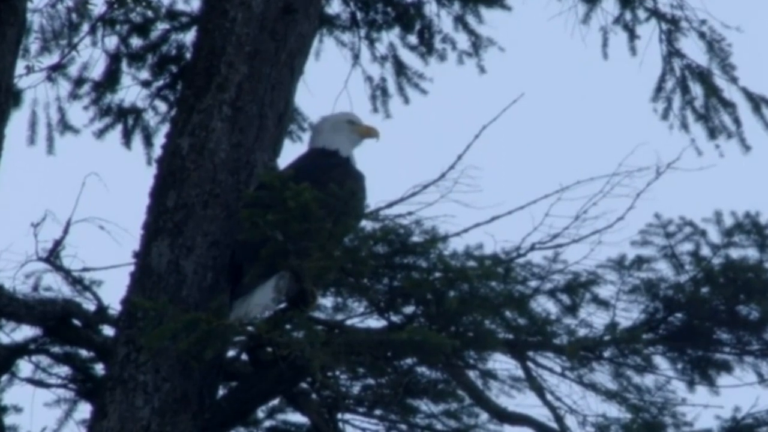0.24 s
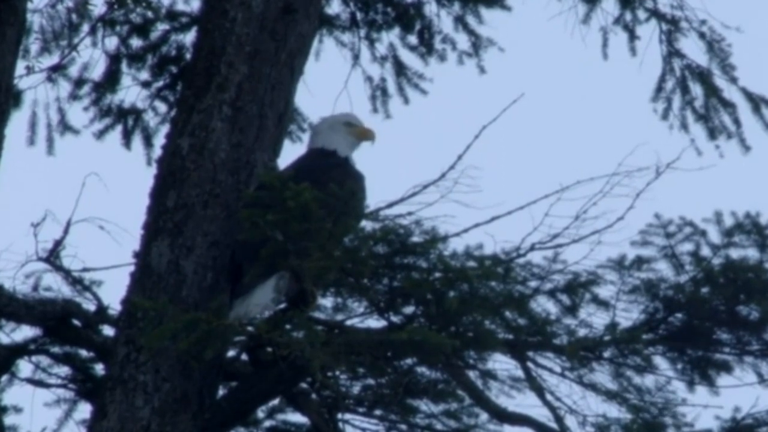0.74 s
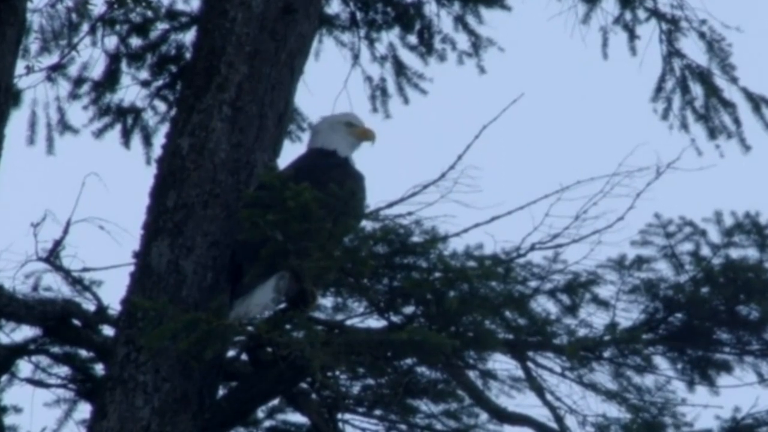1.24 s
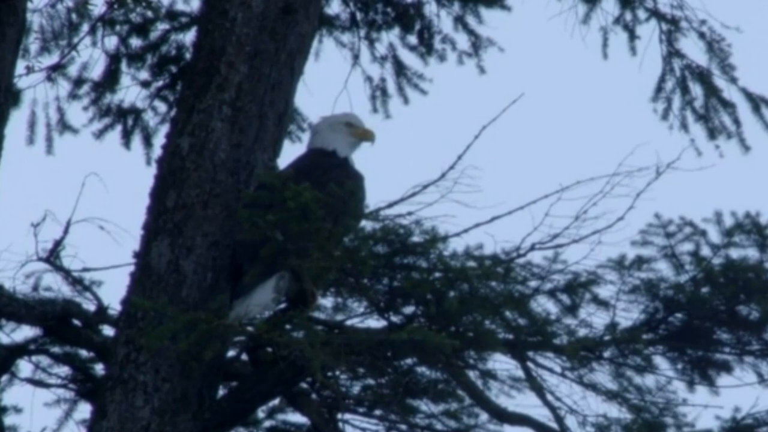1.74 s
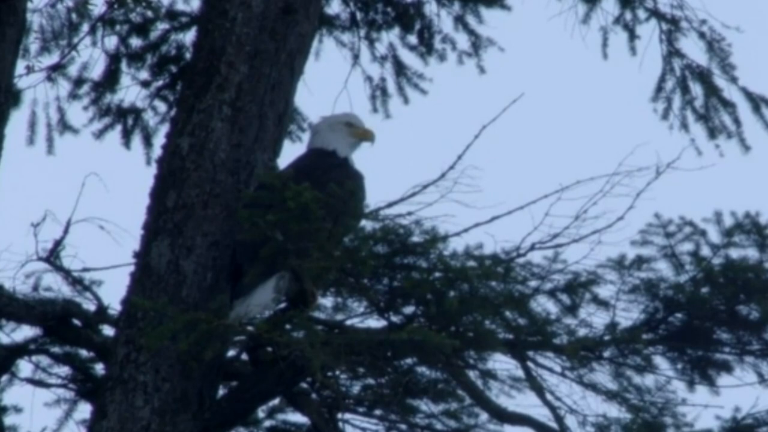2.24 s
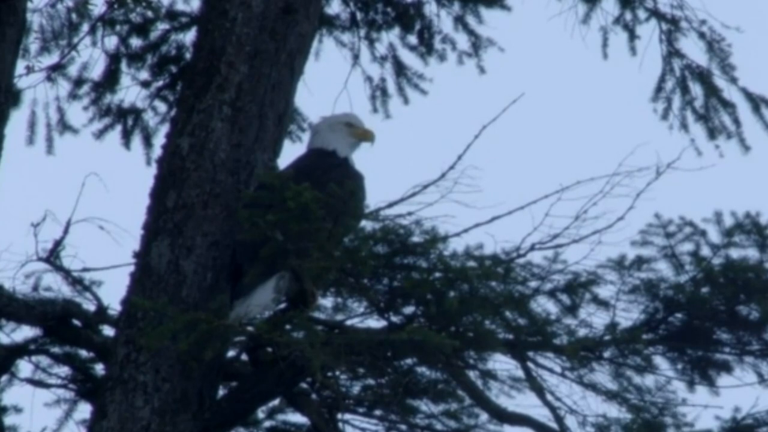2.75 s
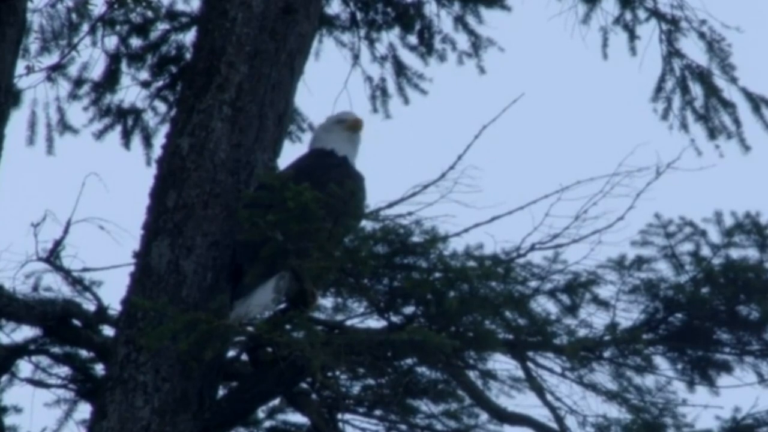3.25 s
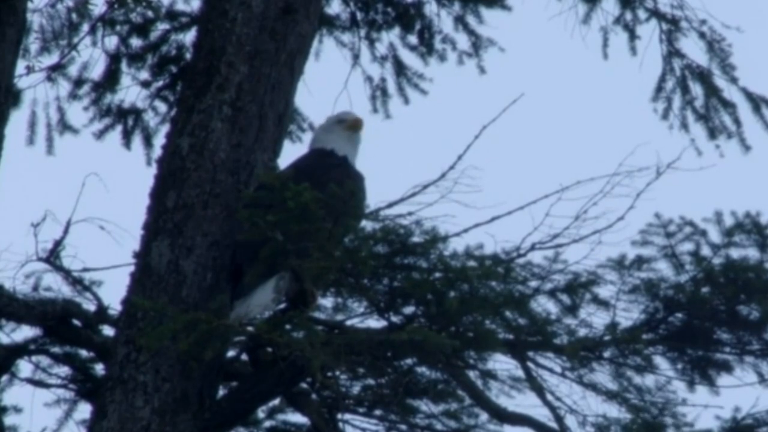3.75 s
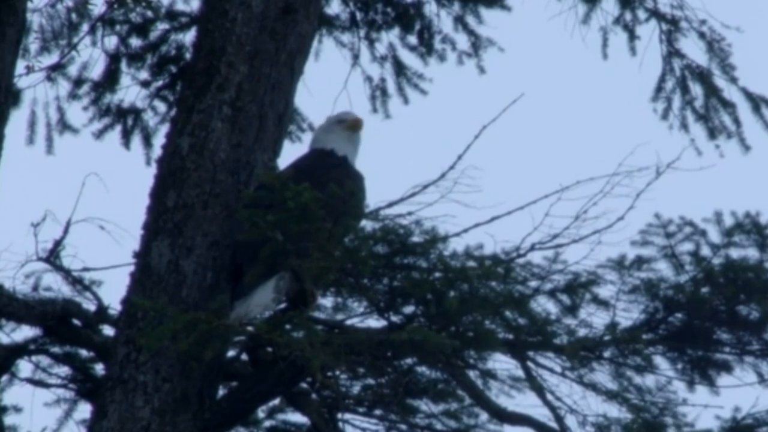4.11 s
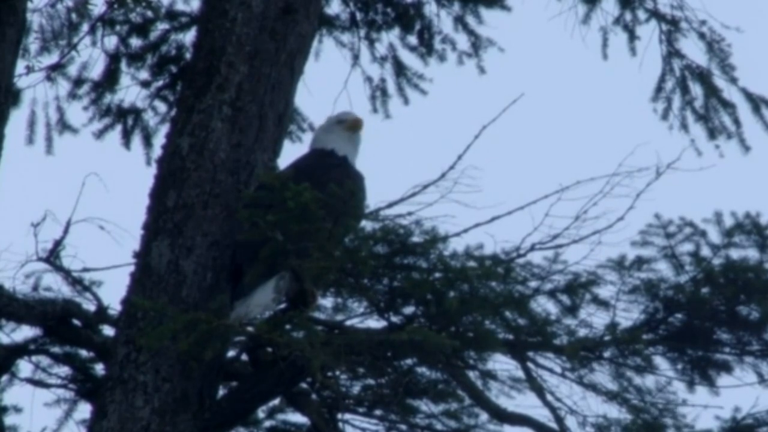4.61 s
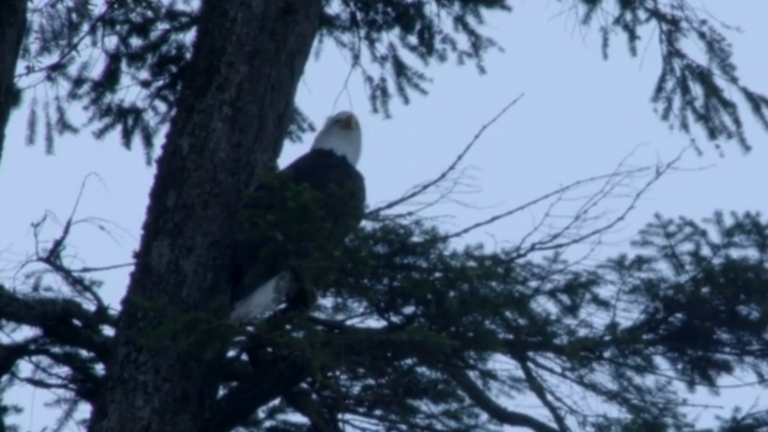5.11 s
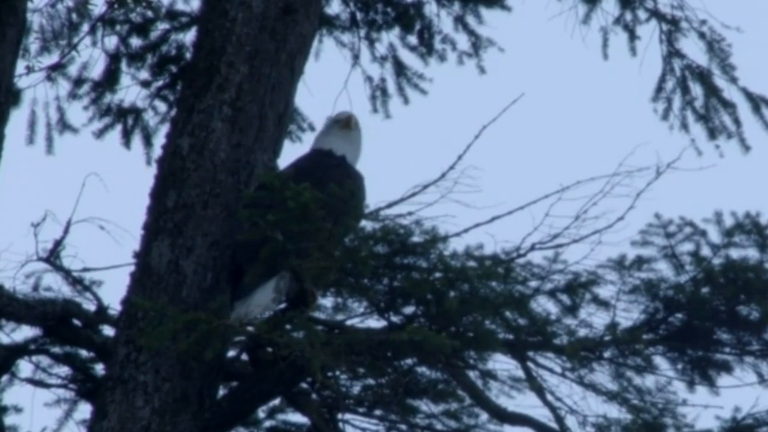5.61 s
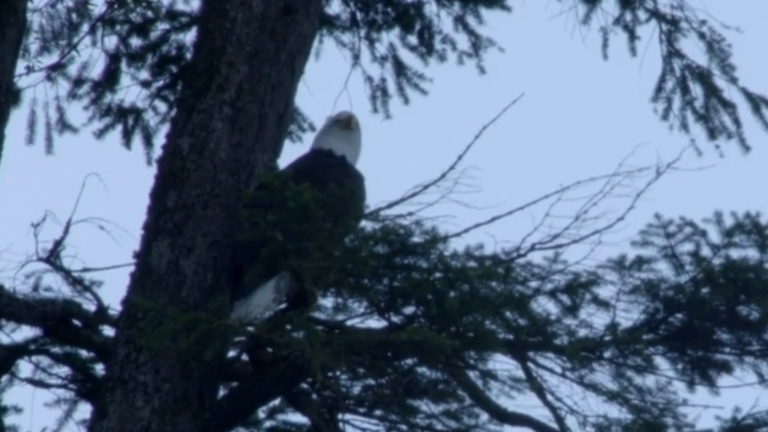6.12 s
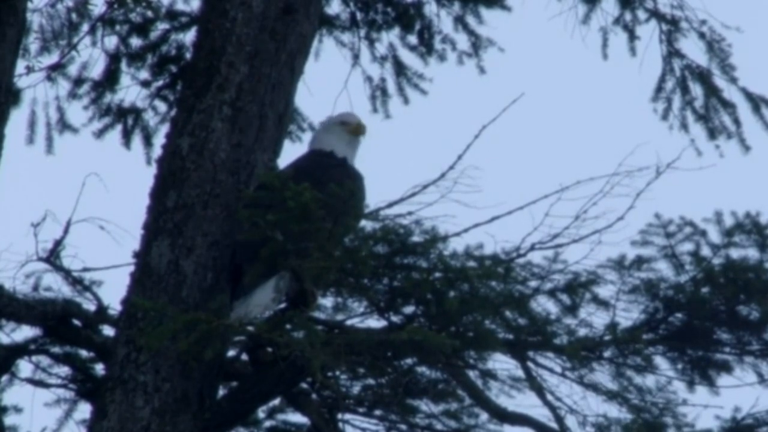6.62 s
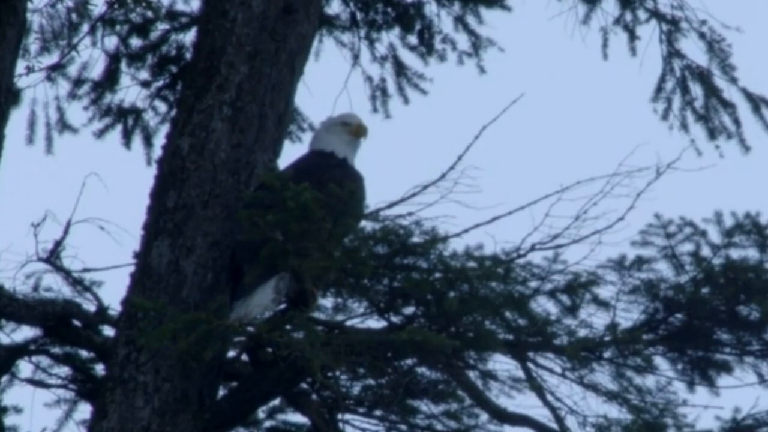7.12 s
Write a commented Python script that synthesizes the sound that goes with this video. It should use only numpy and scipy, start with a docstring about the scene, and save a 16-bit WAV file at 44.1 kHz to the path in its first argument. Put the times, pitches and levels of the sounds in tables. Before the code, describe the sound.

An eagle perched in a tree calls twice, close and central, each call a thin two-toned squeal cracking into a strong, dropping whistle. Around it, a second bird on the right repeats short downward yelps ever faster, a high trill pulses on the left, and distant pips and dry woody rattles appear. Steady insect hiss, forest air and a low hum lie underneath, with slight woodland echo.

```python
"""Eagle calling in a forest

A bald eagle calls twice from a conifer: a thin two-voiced squeal breaks into a loud falling whistle with a
rough end, from syrinx oscillators in one throat. To the right another bird runs through a quickening series
of falling yelps, made as pitch slurs. Around them are pulsed trills, small gliding chirps, twig scratches and
a rattle of damped wood modes, over insect hiss and forest air of filtered noise; early on a low hum switches
in and a rumble passes."""
import sys
import numpy as np
from scipy import signal
from scipy.fft import rfft, irfft
from scipy.io import wavfile
from scipy.ndimage import uniform_filter1d

SR = 44100
rng = np.random.default_rng(int(sys.argv[2]) if len(sys.argv) > 2 else 0)


def bounce(signal):
    """Save signal as a 16-bit WAV file at the path given by the first command-line argument."""
    frames = np.transpose(np.atleast_2d(signal))
    limited = np.clip(frames, -1, 1)
    pcm = np.round(limited * 32767).astype(np.int16)
    wavfile.write(sys.argv[1], SR, pcm)


N = 324576
T = np.arange(N) / SR  # time [s]


# resonances of the throat: (frequency [Hz], gain [dB])
THROAT = [(1000, -10.5), (1550, -12), (2400, -1), (3200, 2), (4800, -7), (6300, -5), (7700, -10.5),
          (8600, -8.5), (9500, -10), (10600, -21.5), (11500, -46)]
# spectral shape of air through the beak: (frequency [Hz], relative level [dB])
BEAK_HISS = [(4500, -39), (7500, -2), (11000, 2.5), (13000, -28)]
# nearby trunks that throw the cry back: (delay [s], level [dB])
TRUNKS = [(.021, -34), (.034, -27)]
# the squeal that opens the first call: (time [s], pitch [Hz], level [dB])
FIRST_SQUEAL = [(4.598, 3200, -46), (4.606, 3020, -42), (4.618, 3600, -33.5), (4.632, 3790, -30.5),
                (4.662, 3820, -24), (4.688, 4030, -20.5), (4.696, 4370, -21), (4.718, 4690, -15.5),
                (4.745, 4640, -19), (4.79, 4380, -20), (4.818, 4440, -21.5), (4.823, 3700, -17.5),
                (4.83, 3250, -21), (4.834, 2450, -30), (4.845, 2400, -33), (4.852, 2750, -39)]
# the squeal that opens the second call: (time [s], pitch [Hz], level [dB])
SECOND_SQUEAL = [(5.591, 2972, -53), (5.598, 3470, -25), (5.642, 6180, -29), (5.665, 4550, -25.5),
                 (5.695, 4170, -25), (5.75, 4380, -20.5), (5.783, 4500, -18.5), (5.792, 3900, -17),
                 (5.805, 2450, -25)]
# the loud whistles: (start [s], hold [s], release [s], pitch [Hz], sag [Hz/s], break [Hz], level [dB],
# level change while held [dB/s], second harmonic [dB], third harmonic [dB], slap of the slack membrane [dB],
# period doubles after [s from start], half-pitch share [0-1])
WHISTLES = [(4.846, 0.094, 0.086, 3146, 1344, 421, -13, 11, -19, -30.5, -7, 0.14, .05),
            (5.818, 0.12, 0.058, 3181, 520, 518, -7.5, -31.5, -11.5, -17, -13, 0.065, 0.41)]
# the other side of the syrinx: (start [s], end [s], first pitch [Hz], last pitch before the collapse [Hz],
# last level [dB], swell [dB], second harmonic [dB])
SECOND_VOICES = [(4.732, 4.839, 4640, 5000, -18.5, 4, -30), (5.663, 5.807, 5050, 5350, -15.5, 12.5, -7.5)]
# the voice cracks between squeal and whistle: (start [s], pitch reached [Hz], level [dB])
CRACKS = [(4.831, 3850, -17), (5.801, 4010, -15)]
ECHO_S = .165


def eagle(coupling=0.28, hiss_db=-20):
    """Nonlinear coupling: two voices share one airflow and throat, so sum tones arise; trees scatter the cry."""
    lead = squeal(FIRST_SQUEAL, second_db=-24.5, third_db=-30)
    lead = lead + squeal(SECOND_SQUEAL, second_db=-10.5, third_db=-18)
    lead = lead + sum(whistle(*row) for row in WHISTLES)
    upper = sum(second_voice(*row) for row in SECOND_VOICES) + sum(crack(*row) for row in CRACKS)
    # the product of two analytic signals holds only sum frequencies
    sum_tones = np.real(signal.hilbert(lead) * signal.hilbert(upper))
    # air hisses through the beak, most while both voices sound
    air = noise(BEAK_HISS, channels=1)[0]
    flow = uniform_filter1d(np.abs(upper) + 0.11 * np.abs(lead), size=300)
    hiss = undb(hiss_db) * flow * air / air.std()
    voice = colour(lead + upper + coupling * sum_tones + hiss, THROAT)

    branches = trees(voice, t60=.07, wet_db=-26).mean(axis=0)
    trunks = sum(undb(db) * np.interp(T - s, T, voice) for s, db in TRUNKS)
    echo = trees(np.interp(T - ECHO_S, T, voice), t60=.025, wet_db=-38)
    return voice + branches + trunks + echo + trees(voice, t60=.5, wet_db=-28)


STEADY_ROUGH, ROUGH_PER_OCTAVE_S = 0.034, 0.019  # roughness at rest, and per octave/s of slide


def squeal(rows, second_db, third_db):
    """Instability under rapid pitch change: a thin tone, clean where it holds and rough where it slides."""
    hz, db = curve(rows)
    octaves_per_s = uniform_filter1d(np.abs(np.gradient(np.log2(hz))) * SR, size=400)
    rough = np.minimum(STEADY_ROUGH + ROUGH_PER_OCTAVE_S * octaves_per_s, .27)
    sounding = gate(rows[0][0], rows[-1][0], .003, 0.0017)
    return membrane(hz, rough, second_db, third_db) * undb(db) * sounding


def second_voice(start, end, first_hz, last_hz, db, swell_db, second_db,
                 edge_s=0.024, edge_rough=0.32, collapse_hz=350):
    """Independent second oscillator: it rises, levels off, and is rough as it catches and collapses."""
    to_go = (1 - np.clip((T - start) / (end - start), 0, 1)) ** 1.9
    collapse = np.clip(1 - (end - T) / edge_s, 0, 1)
    hz = last_hz + (first_hz - last_hz) * to_go - collapse_hz * collapse
    rough = STEADY_ROUGH + edge_rough * (1 - gate(start, end, edge_s, edge_s))
    tone = membrane(hz, rough, second_db, third_db=-43)
    return tone * undb(db - swell_db * to_go) * gate(start, end, .004, edge_s)


CRACK_S, CRACK_SCOOP_HZ, CRACK_RISE_S, CRACK_ROUGH = 0.024, 550, 0.0054, 0.25


def crack(start, hz, db):
    """Exponential pitch approach: a rough blip that scoops up to its pitch."""
    pitch = hz - CRACK_SCOOP_HZ * np.exp(-np.maximum(T - start, 0) / CRACK_RISE_S)
    tone = membrane(pitch, CRACK_ROUGH, second_db=-26.5, third_db=-53)
    return tone * undb(db) * gate(start, start + CRACK_S, 0.0083, 0.014)


ATTACK_S, SETTLE_HZ, SETTLE_S = 0.018, 238.3, 0.0198  # a whistle starts sharp and settles
BREAK_S, FALL_HZ, FALL_DB = .009, 980, 18  # in the release the pitch breaks down a step, then slides away
CATCH_S, STALL_ROUGH = .0018, .28
CRACKLE_DB, CRACKLE_HZ = 2, 450
WHISTLE_ROUGH, RELEASE_ROUGH, RELEASE_HALF = 0.028, 0.16, 0.38
FALTER_HZ, FALTER_DEPTH, FALTER_S = 188, 0.22, 0.01  # the tone flutters around the break
# the voice stalls and catches again higher: (time [share of the release], jump [Hz], dip [0-1])
CATCHES = [(.55, 190, .65), (.77, 70, .4)]


def whistle(start, hold, release, hz, sag, break_hz, db, swell, second_db, third_db, slap_db,
            doubles_after, share):
    """Register break: a clean sagging tone flutters as the pressure goes, breaks down, catches and roughens."""
    t = np.clip(T - start, 0, hold + release)
    held = np.minimum(t, hold)
    spent = np.clip((t - hold) / release, 0, 1)
    broken = (1 + np.tanh((t - hold) / BREAK_S - 1)) / 2
    pitch = hz + SETTLE_HZ * np.exp(-t / SETTLE_S) - sag * held - break_hz * broken - FALL_HZ * spent ** 2
    stall = 0
    for when, jump_hz, dip in CATCHES:
        catch = (t - hold - when * release) / CATCH_S
        pitch = pitch + jump_hz * (1 + np.tanh(2 * catch)) / 2
        stall = stall + dip * np.exp(-catch ** 2)
    rough = WHISTLE_ROUGH + RELEASE_ROUGH * broken * np.sqrt(spent) + STALL_ROUGH * stall

    # period doubling, first in the held tone and then in the release
    held_half = share * np.clip((t - doubles_after) / 0.0047, 0, 1) * (1 - broken) ** 2
    release_half = RELEASE_HALF * np.clip((t - hold) / BREAK_S - 1.7, 0, 1) * (1 + spent)

    crackle = undb(CRACKLE_DB * broken * np.tanh(walk(CRACKLE_HZ)))
    near_break = np.exp(-((t - hold - FALTER_S) / FALTER_S) ** 2)
    falter = 1 + FALTER_DEPTH * near_break * np.sin(2 * np.pi * FALTER_HZ * (t - hold))
    level = undb(db + swell * held - FALL_DB * spent ** 1.88)
    strength = (1 - np.exp(-t / ATTACK_S)) * falter * crackle * (1 - stall) * level
    sounding = gate(start, start + hold + release, .003, .008)
    tone = membrane(pitch, rough, second_db, third_db, held_half + release_half, slap_db)
    return tone * strength * sounding


def membrane(hz, rough, second_db, third_db, half=0, slack_db=-13,
             jitter=0.13, shimmer=1.0, air=0.21, sub_db=-11):
    """Self-sustained oscillation of one syrinx side: a near sine, unsteady and period-doubling when slack."""
    rough = np.clip(rough, 0, 1)
    # at low pitch the slack membrane slaps shut, which lifts the second harmonic
    slack = np.clip((2870 - hz) / 200, 0, 1)
    # and its cycles turn irregular
    unsteady = 1 + rough * (jitter + .05 * slack) * walk(700)
    phase = turn(uniform_filter1d(hz, size=130) * unsteady)
    second = undb(second_db) + undb(slack_db) * slack * (1 - half)
    wave = np.sin(phase) + second * np.sin(2 * phase) + undb(third_db) * np.sin(3 * phase)
    # strong and weak cycles alternate, which puts lines halfway between the harmonics
    wave = wave * (1 + half * np.cos(phase / 2)) + undb(sub_db) * half * slack * np.sin(phase / 2)
    # the swing falters, and turbulent air rides on the tone
    return wave * (1 + shimmer * rough * np.tanh(walk(320)) + air * np.sqrt(rough) * walk(2400))


# model yelp, before its course reshapes it: (time from start [s], pitch [Hz], level [dB])
YELP = [(-.005, 1760, -30), (0, 1610, -6), (.005, 1465, 0), (.009, 1405, 0), (.016, 1340, -2),
        (.022, 1130, -8), (.029, 1010, -6), (.036, 945, -12), (.045, 850, -30)]
# the series of yelps: (time [s], relative level [dB])
YELPS = [(4.472, -40.5), (4.681, -35), (4.872, -32), (5.032, -30), (5.19, -31), (5.334, -31),
         (5.472, -28.5), (5.61, -29), (5.743, -28), (5.873, -28.5), (5.997, -27.5), (6.115, -28.5),
         (6.229, -27), (6.337, -27.5), (6.446, -26.5), (6.548, -26.5), (6.647, -28.5), (6.747, -28),
         (6.85, -30), (6.95, -30.5), (7.045, -30.5)]
# course of the series, from flat and short to fast and full:
# (time [s], share of the full slide [ratio], drop comes sooner by up to [s], fade of the low end [dB])
YELP_COURSE = [(4.5, .45, 0, 7), (5.2, .7, 0, 4), (5.7, .95, 0, 3), (6.3, .97, 0, 1.5), (6.7, 1, .001, 0),
               (7.05, .92, .004, -3)]
YELP_CENTRE_HZ = 1433  # the slide is scaled about this pitch


def yelping_bird(pan_db=-7, second_db=-17):
    """Frequency modulation: downward slurs whose slide, timing and low end change as the series quickens."""
    out, waver, ragged = np.zeros(N), walk(250), undb(1.5 * walk(110))
    length = YELP[-1][0]
    for s, db in YELPS:
        near = (T > s + YELP[0][0]) & (T < s + length)
        t = T[near] - s
        reach, hurry_s, fade_db = curve(YELP_COURSE, s)
        hz = curve(YELP, t + hurry_s * np.sin(np.pi * t / length))[0]
        # each yelp slides a little differently
        hz = hz * (1 + (.015 + .6 * t) * rng.standard_normal() + .015 * waver[near])
        phase = turn(YELP_CENTRE_HZ + (hz - YELP_CENTRE_HZ) * reach)
        late = np.clip((t - .01) / 0.014, 0, 1)
        tone = np.sin(phase) + undb(second_db) * late * np.sin(2 * phase)
        level = undb(db + curve(YELP, t)[1] - fade_db * late)
        out[near] += level * ragged[near] * tone
    # the scatter comes mostly from the bird's own side
    side_gain = undb(np.array([[pan_db], [-pan_db]]) / 3)
    scatter = trees(out, t60=.65, wet_db=-6) * side_gain
    branches = trees(out, t60=.09, wet_db=-11)
    return place(out, pan_db, lag_ms=0.1) * undb(-2.5) + branches + scatter


# high trills: (start [s], end [s], relative level [dB])
TRILLS = [(0.452, 1.274, -43), (1.973, 2.736, -43.5), (3.743, 4.333, -44), (5.217, 5.95, -43.5),
          (6.735, 7.4, -44)]
TRILL_PULSE_HZ = 54.5


def trilling_bird(pitch_hz=6245, under_hz=5730):
    """Amplitude modulation: buzzy trills rise as they swell; later a weaker low note fills the pulse gaps."""
    out, waver = np.zeros(N), 16 * walk(90)
    for start, end, db in TRILLS:
        near = (T > start) & (T < end)
        t = T[near] - start
        beat = np.sin(np.pi * TRILL_PULSE_HZ * t) ** 2
        rise_hz = 170 * np.clip(1 - t / 0.3, 0, 1)
        hz = pitch_hz - rise_hz - 25 * np.sin(2 * np.pi * TRILL_PULSE_HZ * t)
        high = beat ** 1.17 * np.sin(turn(hz + waver[near]))
        low_level = .6 * np.clip((t - .25) / .2, 0, 1) * (1 - beat) ** 2
        low = low_level * np.sin(turn(under_hz + 2 * waver[near]))
        out[near] = undb(db) * (high + low) * gate(start - .03, end, 0.16, 0.0086, T[near])
    out *= undb(1.0 * walk(30))
    scatter = trees(out, t60=0.18, wet_db=-7)
    return place(out, pan_db=7.5) * undb(6.5) + scatter


# a small bird's peaked chirps: (time of the peak [s], top pitch [Hz], relative level [dB])
CHIRPS = [(0.024, 4230, -38), (0.373, 4230, -38), (.796, 4290, -37), (1.286, 4300, -38.5),
          (6.412, 4330, -40), (6.735, 4400, -38.5), (7.13, 4450, -41)]
CHIRP_RISE_HZ_PER_S, CHIRP_FALL_HZ, CHIRP_FALL_S, CHIRP_RASP = 23800, 1436, 0.031, 0.027
CHIRP_ATTACK_S, CHIRP_DECAY_S, CHIRP_S = .024, .02, .06  # CHIRP_S: from the peak to the end


def chirping_bird():
    """Pitch glide with exponential decay: chirps shoot up to a peak and fall raggedly, blurred by the trees."""
    out, flutter, ragged = np.zeros(N), walk(610), undb(3.5 * walk(120) - 2)
    for s, top_hz, db in CHIRPS:
        near = (T > s - CHIRP_ATTACK_S) & (T < s + CHIRP_S)
        before, after = np.maximum(s - T[near], 0), np.maximum(T[near] - s, 0)
        fall_hz = CHIRP_FALL_HZ * (1 - np.exp(-after / CHIRP_FALL_S))
        hz = (top_hz - CHIRP_RISE_HZ_PER_S * before - fall_hz) * (1 + CHIRP_RASP * flutter[near])
        swell = (1 - before / CHIRP_ATTACK_S) * np.exp(-after / CHIRP_DECAY_S)
        out[near] += undb(db) * swell * ragged[near] * np.sin(turn(hz))
    return place(out, pan_db=0) + trees(out, t60=.7, wet_db=0)


# short pips on nearly one pitch: (time [s], relative level [dB])
PIPS = [(1.485, -40.5), (1.54, -43.5), (1.695, -40.5), (1.645, -47), (3.343, -40.5), (3.368, -52),
        (3.53, -41), (3.743, -39.5), (5.132, -41.5), (5.317, -41.5), (7.0, -42), (7.183, -41.5)]
PIP_HZ, PIP_S, PIP_SAG_HZ, PIP_RASP = 3505, .036, 36, .007
# husky notes that swell and fade: (time [s], relative level [dB])
HUSKS = [(.49, -50.5), (2.25, -42.5), (2.88, -47), (4.31, -47), (5.42, -48)]
HUSK_HZ, HUSK_S, HUSK_RISE_HZ, HUSK_RASP = 4390, 0.28, 148, 0.04
# far slurred whistles: (time [s], length [s], pitch [Hz], slide over the note [Hz],
# relative level [dB], rasp [share of the pitch])
SLURS = [(0.028, 0.35, 1970, -13.5, -48.5, 0.037), (0.113, 0.033, 2990, -250, -40.5, 0.04),
         (0.171, 0.059, 2856, 280, -42, 0.046), (1.617, 0.018, 1420, -27, -35, .004),
         (3.37, 0.06, 2540, 2, -50, 0.0074), (3.574, 0.027, 1980, -110, -43, .01),
         (6.09, 0.12, 7700, -1100, -43.5, 0.046), (7.027, 0.16, 6470, -100, -43, 0.014),
         (7.141, 0.042, 990, -100, -45, .013), (7.147, 0.059, 1910, -450, -44.5, 0.033)]
# a harsh scolding burst: (time [s], length [s], pitch [Hz], slide over the note [Hz], relative level [dB])
SCOLDS = [(.04, 0.097, 3500, 400, -40.5), (.1, .1, 3950, -300, -40.5)]
SCOLD_RASP = .13
# very high, thin, arched whistles: (time [s], length [s], pitch [Hz], relative level [dB])
THIN_WHISTLES = [(0.778, 0.27, 7820, -49.5), (1.65, .22, 7450, -51), (6.458, .32, 8070, -50)]
THIN_ARCH_HZ, THIN_SAG_HZ, THIN_RASP = 380, 504, .014


def small_birds():
    """Gliding tones in a diffuse field: distant notes swell and fade on straight or arched slides."""
    pips = [(s, PIP_S, PIP_HZ, -PIP_SAG_HZ, db, PIP_RASP, 0) for s, db in PIPS]
    husks = [(s, HUSK_S, HUSK_HZ, HUSK_RISE_HZ, db, HUSK_RASP, 0) for s, db in HUSKS]
    slurs = [(*row, 0) for row in SLURS]
    scolds = [(*row, SCOLD_RASP, 0) for row in SCOLDS]
    thin = [(s, length, hz, -THIN_SAG_HZ, db, THIN_RASP, THIN_ARCH_HZ)
            for s, length, hz, db in THIN_WHISTLES]
    out, flutter = np.zeros(N), walk(494)
    for s, length, hz, slide_hz, db, rasp, arch_hz in pips + husks + slurs + scolds + thin:
        near = (T > s) & (T < s + length)
        u = (T[near] - s) / length
        swell = np.sin(np.pi * u)
        pitch = (hz + slide_hz * u + arch_hz * swell) * (1 + rasp * flutter[near])
        out[near] += undb(db) * swell * np.sin(turn(pitch))
    return place(out, pan_db=1) + trees(out, t60=.5, wet_db=-1)


# bursts of dry rattling: (first tap [s], last tap [s], tap rate [1/s], level [dB],
# correlation of left and right [-1..1])
RATTLES = [(3.583, 3.846, 24, -31.5, -0.51), (4.563, 4.862, 26, -34.5, -0.35),
           (5.969, 6.25, 24.5, -36, -0.62)]
# what each tap rings in the wood: (frequency [Hz], relative level [dB])
WOOD_MODES = [(790, -4), (1070, 2), (1250, 0.5), (1650, -9), (2050, 1), (2620, -1), (3180, -3.5)]


def rattle(decay_s=.013, spread=.035):
    """Damped modal ringing: runs of dry taps on wood, like a woodpecker drumming far away."""
    wood = np.array([sum(undb(db) * np.sin(turn(hz * (1 + spread * walk(150)))) for hz, db in WOOD_MODES)
                     for _ in range(2)])
    out = 0
    for first, last, rate, db, likeness in RATTLES:
        age = (T - first) % (1 / rate)  # time since the latest tap
        taps = np.minimum(age / 0.0023, 1) * np.exp(-age / decay_s)
        taps = taps * gate(first, last, .002, 0.0037)
        out = out + undb(db) * taps * widen(*wood / wood.std(), likeness)
    return out


# scratchy rustles in the twigs: (time [s], level [dB], decay [s])
RUSTLES = [(0.013, -35.5, 0.026), (.06, -40, 0.017), (.11, -56, 0.042), (0.344, -42.5, 0.17),
           (4.165, -42, 0.02), (5.375, -40, 0.062)]


def rustles():
    """Impulsive friction noise: brief scratches of dry twigs start abruptly and decay exponentially."""
    strength = 0
    for s, db, decay_s in RUSTLES:
        fade = np.exp(-np.maximum(T - s, 0) / decay_s)
        strength = strength + undb(db) * np.clip((T - s) / 0.0007, 0, 1) * fade
    twigs = noise([(400, -29), (1100, -1.5), (2200, -7.0), (3600, -5.5), (5000, -56), (9000, -37)])
    return strength * twigs / twigs.std()


# insect chorus: (centre [Hz], width scale [Hz], level [dB], mean throb rate [1/s], throb depth [0-1],
# level wander [dB], correlation of left and right [-1..1])
INSECTS = [(4148, 190, -48.5, 9.5, 0.42, -1.2, -0.67), (4655, 180, -53.5, 9.3, 0.57, -1, 0.4),
           (5424, 210, -45.5, 15, 0, 1.6, -0.4), (5805, 610, -48, 5.8, 0.08, 3.6, -0.081),
           (6955, 375, -42.5, 14, 0.06, 0.94, -0.12)]


def insects():
    """Narrow-band noise: stridulation from many insects, each kind with its own loose throb rate."""
    out, f = 0, np.fft.rfftfreq(N, 1 / SR)
    for hz, width_hz, db, rate, depth, wander_db, likeness in INSECTS:
        response = 1 / (1 + ((f - hz) / (.7 * width_hz)) ** 2) ** 1.5
        band = irfft(rfft(rng.standard_normal((2, N))) * response, N)
        pair = widen(*band / band.std(), likeness)
        throb = 1 + depth * np.sin(turn(rate * (1 + 0.208 * walk(2.8))))
        out = out + pair * throb * undb(db + wander_db * walk(1.4))
    return out


# forest air: (frequency [Hz], density [dB per Hz])
AIR = [(25, -91), (150, -100), (300, -98), (600, -90), (1200, -83), (2300, -83), (3700, -84), (4600, -81),
       (6300, -81), (7400, -85), (7900, -91), (8900, -92), (9700, -107), (12500, -110), (14000, -118)]
# wind in far trees, before its swell: (frequency [Hz], density [dB per Hz])
WIND = [(250, -108), (450, -79.5), (650, -70), (830, -64), (1050, -68.5), (1380, -71), (1650, -64.5),
        (3000, -100), (8000, -140)]
# how the wind swells: (time [s], gain [dB])
WIND_SWELL = [(0, -13), (.7, -15.5), (1.2, -9.5), (1.6, -18), (2.3, -9.5), (3.2, -10.5), (4.2, -12),
              (5.2, -10), (6.3, -17.5), (7.36, -14)]
# low hum, before its swell: (frequency [Hz], density [dB per Hz])
HUM = [(20, -101), (35, -85.5), (56, -73), (85, -77.5), (115, -76), (150, -80), (260, -79), (340, -82.5),
       (440, -86), (500, -81), (560, -72.5), (640, -81), (1200, -80), (2500, -105), (8000, -140)]
# how the hum swells: (time [s], gain [dB])
HUM_SWELL = [(1.3, -1.5), (2.2, -0.5), (2.85, -1.5), (3.1, -2.5), (7.36, -2.5)]
# a deep rumble that swells and passes: (frequency [Hz], density [dB per Hz])
RUMBLE = [(20, -92), (40, -74), (58, -73.5), (90, -75), (160, -100), (1000, -160)]
HUM_START_S, RUMBLE_START_S, RUMBLE_END_S = 1.28, 1.3, 3.0


def forest():
    """Spectrally shaped noise: even air, wide swelling wind, an abrupt centred hum and a passing rumble."""
    air = noise(AIR) * undb(.5 * walk(16))
    wind = widen(*noise(WIND), likeness=-.5) * undb(curve(WIND_SWELL)[0] + 1 * walk(5))
    hum_on = np.clip((T - HUM_START_S) / 0.013, 0, 1)
    hum = noise(HUM, channels=1) * hum_on * undb(curve(HUM_SWELL)[0] + 1 * walk(8.0))
    rumble = noise(RUMBLE, channels=1) * gate(RUMBLE_START_S, RUMBLE_END_S, 0.58, .15)
    return air + wind + hum + rumble


def trees(x, t60, wet_db):
    """Diffuse scattering: trunks and branches return decaying noise echoes, unrelated left and right."""
    t = T[:SR]
    decay = np.exp(-np.log(1000) * t / t60)  # 60 dB down at t60
    tail = rng.standard_normal((2, SR)) * decay * np.minimum(t / 0.011, 1)
    tail /= np.sqrt(np.sum(tail ** 2, axis=1, keepdims=True))
    return undb(wet_db) * signal.fftconvolve(x[None], tail, axes=1)[:, :N]


def place(x, pan_db, lag_ms=0):
    """Interchannel level and time difference: left minus right in dB, and the lag of the right channel."""
    f = np.fft.rfftfreq(N, 1 / SR)
    late = irfft(rfft(x) * np.exp(-2j * np.pi * f * lag_ms / 10 ** 3), N)
    return np.array([x * undb(pan_db / 2), late * undb(-pan_db / 2)])


def widen(mid, side, likeness):
    """Interchannel correlation: sum and difference of two unrelated sounds set how alike the sides are."""
    c = np.clip(likeness, -1, 1)
    return mid * np.sqrt((1 + c) / 2) + np.array([side, -side]) * np.sqrt((1 - c) / 2)


def noise(points, channels=2):
    """Power spectral density: white noise shaped to a given density in dB per Hz."""
    return colour(rng.standard_normal((channels, N)), points) * np.sqrt(SR / 2)


def colour(x, points):
    """Linear filtering: gains from (frequency [Hz], level [dB]) points, joined on a log-frequency axis."""
    hz, db = np.transpose(points)
    f = np.maximum(np.fft.rfftfreq(N, 1 / SR), 1)
    return irfft(rfft(x) * undb(np.interp(np.log(f), np.log(hz), db)), N)


def walk(rate):
    """Low-pass random process: smooth chance of spread 1 that changes about rate times a second."""
    f = np.fft.rfftfreq(N, 1 / SR)
    y = irfft(rfft(rng.standard_normal(N)) * np.exp(-(f / rate) ** 2), N)
    return y / y.std()


def turn(hz):
    """Phase as the integral of frequency: an oscillator that follows a pitch curve."""
    return 2 * np.pi * np.cumsum(hz) / SR


def gate(start, end, rise, fall, t=T):
    """Trapezoidal envelope: open between two times, with straight ramps inside."""
    return np.clip((t - start) / rise, 0, 1) * np.clip((end - t) / fall, 0, 1)


def curve(rows, t=T):
    """Linear interpolation: the columns of a table, joined by straight lines in time."""
    s, *columns = np.transpose(rows)
    return [np.interp(t, s, c) for c in columns]


def undb(db):
    """Logarithmic level: decibels to amplitude gain."""
    return 10 ** (np.asarray(db) / 20)


def scene():
    """Superposition: the eagle in front, everything else around it."""
    birds = eagle() + yelping_bird() + trilling_bird() + chirping_bird() + small_birds()
    return birds + rattle() + rustles() + insects() + forest()


def record(dry):
    """Band limitation: the recorder cuts the top with a steep elliptic low-pass."""
    top_hz = 14300
    return signal.sosfilt(signal.ellip(8, .2, 70, top_hz, fs=SR, output="sos"), dry)


dry = scene()
out = record(dry)
bounce(out)
```